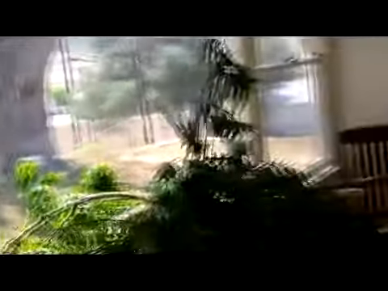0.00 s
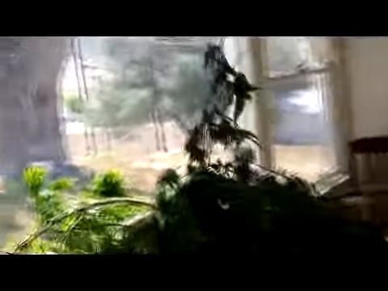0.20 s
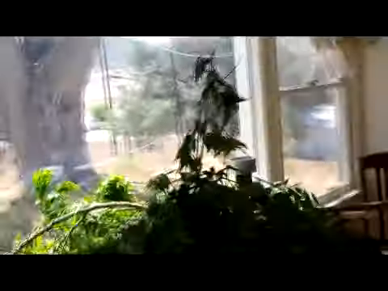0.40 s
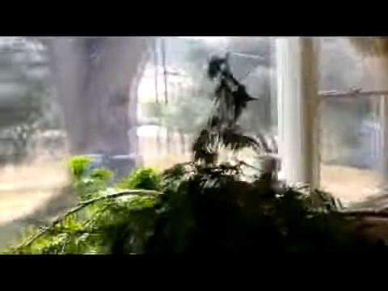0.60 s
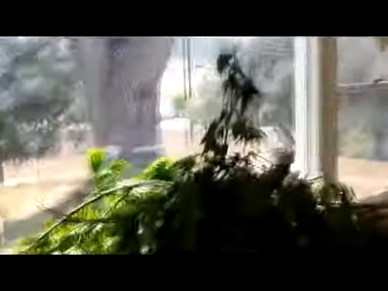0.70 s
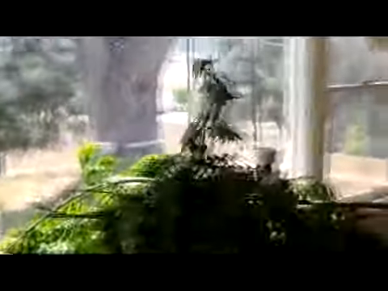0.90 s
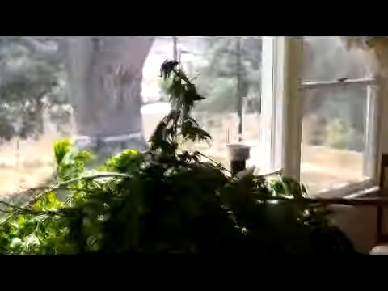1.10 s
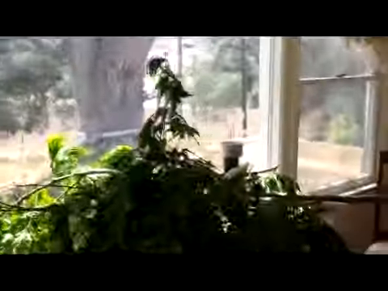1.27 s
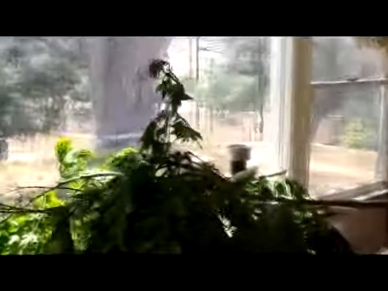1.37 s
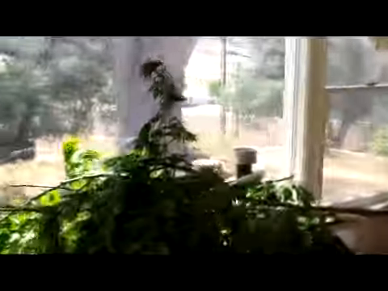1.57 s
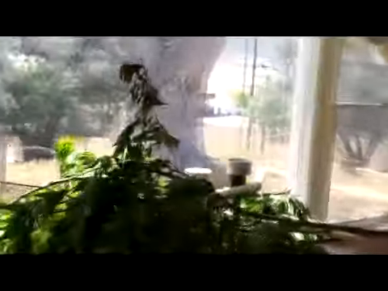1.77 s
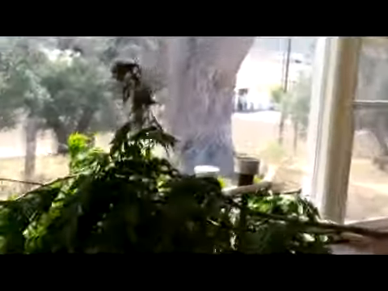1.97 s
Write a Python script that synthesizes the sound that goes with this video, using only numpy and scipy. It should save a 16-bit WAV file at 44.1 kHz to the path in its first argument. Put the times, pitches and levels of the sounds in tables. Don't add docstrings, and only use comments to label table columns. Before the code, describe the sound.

A parrot snaps twigs in rustling foliage indoors, with hard dry ticks and soft handling bumps.

```python
import sys
import numpy as np
from scipy import signal
from scipy.fft import rfft, irfft
from scipy.io import wavfile
from scipy.ndimage import uniform_filter1d

SR = 44100
rng = np.random.default_rng(int(sys.argv[2]) if len(sys.argv) > 2 else 0)


def wrap_up_sound(samples):
    columns = np.atleast_2d(samples).T
    tamed = np.clip(columns, -1, 1)
    steps = np.round(tamed * 32767).astype(np.int16)
    wavfile.write(sys.argv[1], SR, steps)


def magnitude_from_level(level_db):
    exponent = np.asarray(level_db, float) / 20
    return 10 ** exponent


N = 88200


def unit(x):
    return x / np.sqrt(np.mean(x ** 2))


def curve(table):
    return np.interp(np.arange(N) / SR, *np.array(table).T)


def colour(x, table, tilt_db=0., top_db=0.):
    hz = np.maximum(np.arange(N // 2 + 1) * SR / N, 1)
    f, db = np.array(table).T
    shape = np.interp(np.log(hz), np.log(f), db)
    shape += tilt_db * np.minimum(np.log2(hz / 4000), 0)
    shape += top_db * np.maximum(np.log2(hz / 8000), 0)
    return unit(irfft(rfft(x) * magnitude_from_level(shape) * (hz > f[0] / 2), N))


def walk(rate):
    hold = int(SR / rate)
    steps = np.repeat(rng.standard_normal(N // hold + 1), hold)
    return 1.3 * uniform_filter1d(uniform_filter1d(steps, hold), hold)[:N]


def grains(rate, spread_db):
    hit = rng.random((2, N)) < rate / SR
    size = rng.exponential(size=(2, N))
    return hit * magnitude_from_level(spread_db * size) * rng.standard_normal((2, N))


def ring(s, hz, tau):
    t = np.maximum(np.arange(N) / SR - s, 0)
    return (t / tau / 2) ** 2 * np.exp(2 - t / tau) * np.sin(2 * np.pi * hz * t)


def even(x):
    return x / np.sqrt(uniform_filter1d(x[0] ** 2, int(.05 * SR)))


def lean(pan_db):
    return np.array([[pan_db], [-pan_db]]) / 2


def spread(mid, side, side_db):
    return mid + magnitude_from_level(side_db) * side * np.array([[1], [-1]])


def rustle():
    # t/s, level/dB
    effort = [ [(0.0, -47), (0.22, -46.5)], ][0] + [ [(0.37, -48), (0.494, -45.5), (0.51, -51.5)],
              ][0] + [ [(0.6, -54.5), (0.75, -61)], ][0] + [ [(0.79, -64), (0.83, -60), (1.094, -66),
              (1.34, -64)], ][0] + [ [(1.45, -63), (1.566, -58), (1.588, -52.5), (1.684, -53.5),
              (1.692, -49.5), (1.72, -49), (1.76, -51), (1.85, -49), (1.89, -50), (1.944, -49),
              (2.0, -47.5)], ][0]
    # f/Hz, density/dB per Hz
    leaf_colour = [(290, -15.5), (500, -10), (1800, -12), (2600, -9.5), (4300, -8.5), (6640, 0),
                   (14200, -14.5), (14800, -19), (15500, -69)]
    # t/s, level/dB
    sheen = [(0, 0.5), (.7, -0.5), (1.5, 0.5), (1.6, -5), (1.72, -5.5), (1.85, -2), (2, -1)]
    leaf = colour(grains(20000, 1.2), leaf_colour)
    high = signal.butter(4, 10300, "high", fs=SR, output="sos")
    leaf = leaf + (magnitude_from_level(curve(sheen)) - 1) * signal.sosfiltfilt(high, leaf)
    flicker = walk(14.97)
    low = signal.butter(4, 4400, fs=SR, output="sos")
    leaf = leaf + (magnitude_from_level(2 * flicker[::-1]) - 1) * signal.sosfiltfilt(low, leaf)
    whine_hz = 7950 + 25 * walk(40)
    whine = magnitude_from_level(-19 + 6.9 * walk(23)) * np.sin(2 * np.pi * np.cumsum(whine_hz) / SR)
    return (leaf + whine) * magnitude_from_level(curve(effort) + 3.5 + 1.17 * flicker)


def room_tone():
    # f/Hz, density/dB per Hz
    hush = [(59, -25), (100, -10), (253, 1), (323, -4), (458, -10.5), (633, -29), (2500, -24), (3250, -34),
            (5500, -120)]
    mid, side = colour(rng.standard_normal((2, N)), hush) * magnitude_from_level(-77.5)
    return spread(mid, side, -4.5)


def grip():
    # t/s, deep rumble level/dB, boom level/dB
    pressure = [(0, -60.5, -59), (.24, -63, -57), (.28, -52.5, -46), (.4, -56.5, -54), (.46, -70, -47),
                (0.501, -52, -39), (.58, -45, -46), (.7, -59, -61.5), (.77, -59, -75.5), (.93, -67, -68.5),
                (.97, -72.5, -80), (1.17, -71, -80), (1.2, -88, -70), (1.45, -69, -75.5), (1.57, -72, -69),
                (1.582, -68, -52), (1.85, -62, -54), (2, -62, -58)]
    # f/Hz, density/dB per Hz
    deep = [(20, -13), (45, -6), (66, 3.5), (95, -8.5), (140, -17), (400, -75)]
    # f/Hz, density/dB per Hz
    boom = [(40, -31), (80, -8), (120, -1.5), (180, -6), (300, -8.5), (420, -20.5), (900, -30), (2000, -65)]
    s, deep_db, boom_db = np.array(pressure).T
    out = 0
    for body, db in ((deep, deep_db), (boom, boom_db)):
        rumble = even(colour(rng.standard_normal((2, N)), body))
        out = out + rumble * magnitude_from_level(np.interp(np.arange(N) / SR, s, db) + 2 * walk(30.32))
    return spread(out[0], out[1], -14.5)


def bumps():
    # t/s, level/dB, f/Hz, ring/cycles
    knocks = [(.178, -47.5, 290, 2.5), (0.269, -40.5, 281.5, 8.5), (0.299, -47, 107.8, 1.3),
              (0.332, -47, 250, 3.6), (.433, -41, 700, 4), (.45, -46, 1200, 6), (.461, -36, 930, 7),
              (.467, -36, 190, 2.5), (.473, -31.5, 650, 9), (.476, -37, 900, 6), (.477, -46, 1680, 10),
              (.484, -44, 1270, 6), (.488, -36, 523, 5), (.49, -34.5, 342, 5), (.4903, -18.5, 145, 1.35),
              (.5068, -19.5, 115, .9), (.535, -24.5, 150, 1.8), (.551, -29, 110, 1.1),
              (.553, -49, 1750, 10), (.576, -36, 196, 2), (.59, -37, 120, 1.3), (0.606, -38, 95, 1.6),
              (.627, -40, 110, 1.6), (.648, -39, 105, 1.6), (1.245, -64, 560, 6), (1.58, -47, 112.5, 4.8),
              (1.6, -51, 190, 2), (1.668, -47.5, 115, 2.9), (1.709, -47.5, 168, 4.1), (1.847, -46, 354, 3)]
    out = sum(magnitude_from_level(db) * ring(s, hz, cycles / hz / 4) for s, db, hz, cycles in knocks)
    return out * np.array([[1.05], [.95]])


def snaps():
    # t/s, level/dB, room decay/s, tilt/dB per octave below 4 kHz
    breaks = [
        (0.231, -30.5, 0.34, 2.5),
        (0.2414, -38, 0.32, 3),
        (0.254, -57, 0.61, 13),
        (0.81, -56.5, 0.58, 2),
        (0.926, -55.5, 0.17, -1.5),
        (1.36, -50.5, 0.46, -1),
        (1.524, -59.5, 0.29, -1),
        (1.587, -54, 0.26, 1.5),
        (1.692, -55, 0.33, 6),
    ]
    # f/Hz, density/dB per Hz
    twig = [(260, -61), (450, -14), (782, -3.5), (1010, -10), (4000, -11.5), (5600, -0.5), (8290, -2),
            (13500, -19), (16000, -70)]
    sparse = unit(grains(6000, 1.5))
    smooth = rng.standard_normal((2, N))
    out = 0
    for s, db, t60, tilt_db in breaks:
        t = np.maximum(np.arange(N) / SR - s, 0)
        early = np.exp(-t / .03)
        crack = magnitude_from_level(7 + .2 * (db + 30)) * np.exp(-t / .004)
        env = (1 - np.exp(-t / .0003)) * magnitude_from_level(-60 * t / t60) * (1 + crack)
        echoes = (early * sparse + np.sqrt(1 - early ** 2) * smooth) * env
        echoes = colour(echoes, twig, 3 - tilt_db, 0.5 * (db + 34))
        out = out + echoes * np.sqrt(np.mean(env ** 2)) * magnitude_from_level(db)
    return out


def snap_pings():
    # t/s, level/dB, f/Hz, ring/ms, left-right/dB
    pings = [(.2312, -19, 5200, .3, 1), (.2322, -24, 7000, .25, 0), (.2338, -21, 6200, .15, 0),
             (.235, -22, 6000, .3, 0), (.2373, -25, 5300, .25, 0), (.239, -25, 5000, .3, 0),
             (.2431, -22, 6300, .2, 0), (.2445, -27, 8300, .3, 0), (.255, -27, 6500, .25, 0),
             (.261, -29, 5500, .35, 0), (.27, -31, 6500, .3, 0), (1.3605, -49, 7300, .3, 0),
             (1.3655, -51, 6200, .3, 0)]
    out = 0
    for s, db, hz, ms, pan_db in pings:
        lag = rng.uniform(-1, 1) * .0002
        pair = np.array([ring(s + lag, hz, ms / 1000), ring(s - lag, hz, ms / 1000)])
        out = out + magnitude_from_level(db + lean(pan_db)) * pair
    return out


def rubs():
    # start t/s, length/s, level/dB, centre f/Hz, left-right/dB
    strokes = [
        (.43, 0.091, -44.5, 740, 0),
        (0.45, 0.07, -52, 1430, 9),
        (.535, 0.041, -47, 2050, 8.5),
        (0.531, 0.04, -48.5, 3670, 14),
        (0.542, 0.037, -62, 6400, -10),
        (1.14, 0.15, -69.5, 650, .3),
        (1.225, .06, -69, 540, 0),
        (1.162, 0.17, -70.5, 1170, -1),
        (2, 0.15, -67, 800, 4),
        (1.93, 0.19, -54.5, 810, -0.5),
    ]
    noise = rng.standard_normal((2, N))
    rough = magnitude_from_level(2.5 * walk(120))
    out = 0
    for s, length, db, hz, pan_db in strokes:
        pair = spread(noise[0], min(hz / 1600, 1) * noise[1], 0)
        band = signal.butter(2, [hz / 1.5, hz * 1.5], "bandpass", fs=SR, output="sos")
        u = np.clip((np.arange(N) / SR - s) / length, 0, 1)
        swell = np.sin(np.pi * u) ** 0.64
        out = out + unit(signal.sosfilt(band, pair)) * rough * swell * magnitude_from_level(db + lean(pan_db))
    return out


def ticks():
    # t/s, level/dB, left lag/ms, left-right/dB
    hits = [
        (.51905, -2.6, .3, -1.5),
        (.76198, -18.5, .36, -5),
    ]
    # f/Hz, level/dB, rise-and-fall time/ms
    tick_modes = [
        [[(7160, 0.5, 0.11), (10650, -17, 0.22), (11740, -14, 0.13), (15500, -27, 0.2), (3300, -20, 0.34),
         (4000, -26, 0.38), (5000, -33, .6), (2200, -39, 0.37), (760, -29, 0.46)], [(7700, 2, .13),
         (12100, -5, .14), (10100, -11, .16), (14300, -12, .15), (6900, -31, 1.1), (4700, -25.5, 0.31),
         (1960, -19.5, .2), (800, -20.5, 0.32), (3700, -37, 0.5)]],
        [[(7000, -0.5, 0.15), (9400, -19, 0.12), (13500, -32, .15), (2680, -7.5, 0.2), (15500, -32, .1),
         (990, -15, 0.31)], [(8300, 2, .075), (10800, -26, .11), (14000, -14, 0.14), (5200, -23, 0.25),
         (16000, -25, .1), (1720, -28, 0.18)]],
    ]
    out = np.zeros((2, N))
    for (s, db, lag_ms, pan_db), modes in zip(hits, tick_modes):
        for ch, (lag, gain_db) in enumerate([(lag_ms / 1000, pan_db / 2), (0, -pan_db / 2)]):
            body = sum(magnitude_from_level(m_db) * ring(s + lag, hz, ms / 1000) for hz, m_db, ms in modes[ch])
            out[ch] += magnitude_from_level(db + gain_db) * body
    return out


def scene():
    return rustle() + room_tone() + grip() + bumps() + snaps() + snap_pings() + rubs() + ticks()


def top_cut(x):
    return signal.sosfilt(signal.butter(12, 17120, fs=SR, output="sos"), x)


def record(dry):
    # f/Hz, level/dB per bin
    threshold = [(3000, -105), (11000, -101), (12500, -94), (13800, -85), (14700, -77), (15500, -90),
                 (16600, -92), (17000, -20)]
    held = dry / (1 + (dry / .94) ** 6) ** (1 / 6)
    hz, _, z = signal.stft(held, SR, nperseg=1024)
    band = np.abs(z[:, :512].reshape(2, 128, 4, -1)).mean(axis=2)
    band = np.repeat(band, 4, axis=1)
    flutter = rng.standard_normal((128, z.shape[2]))
    flutter = np.repeat(np.repeat(flutter, 4, axis=0), 4, axis=1)[:, :z.shape[2]]
    floor_db = np.interp(hz[:512], *np.array(threshold).T)[:, None]
    z[:, :512] *= band > magnitude_from_level(floor_db + 5 * flutter)
    mix = signal.istft(z, SR, nperseg=1024)[1][:, :N]
    return top_cut(mix)


dry = scene()
out = record(dry)
wrap_up_sound(out)
```